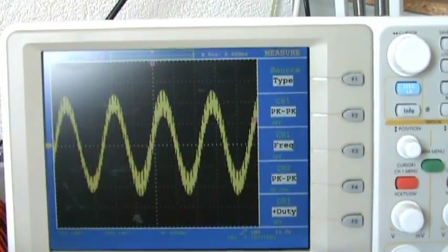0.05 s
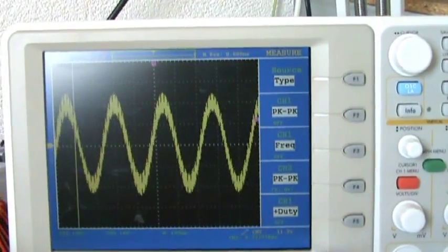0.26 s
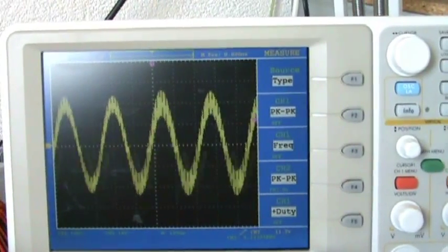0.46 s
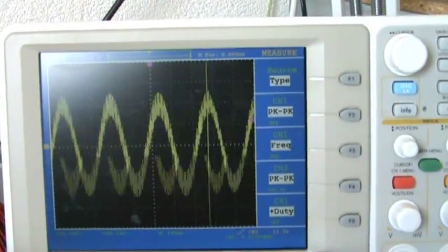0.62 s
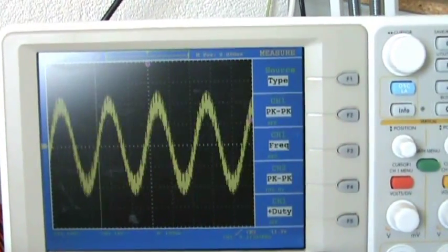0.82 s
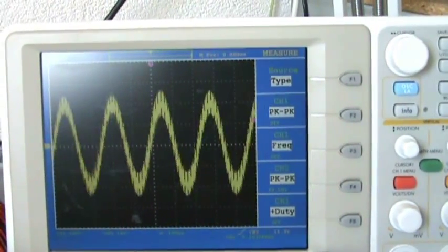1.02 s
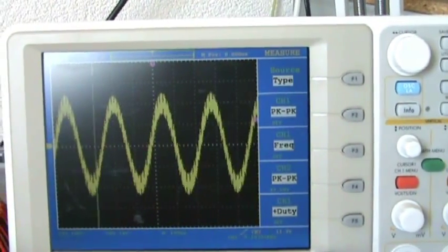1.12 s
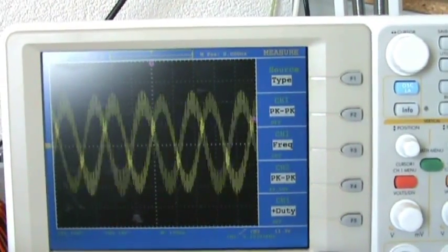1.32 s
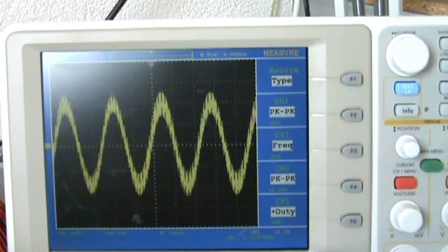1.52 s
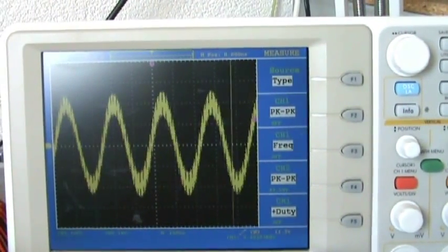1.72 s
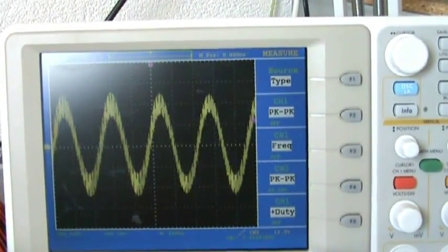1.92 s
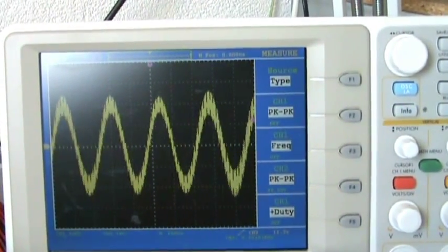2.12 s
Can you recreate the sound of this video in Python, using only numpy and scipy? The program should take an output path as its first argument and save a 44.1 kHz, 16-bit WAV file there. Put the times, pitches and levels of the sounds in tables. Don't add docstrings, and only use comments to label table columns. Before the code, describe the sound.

A running electrical circuit buzzes without pause from 0 to about 2.1 seconds: a thin, raspy mid-pitched buzz, a dominant piercing steady whine very high up, and bright hiss pulsing with the buzz. Low hum, fan drone and soft room air lie faintly beneath. Barely audible dull knocks fall around 0.6 and 0.9. At 1.64 a small dry plastic click rattles briefly, close by, slightly left.

```python
import sys
import numpy as np
from scipy import signal
from scipy.io import wavfile

SR = 44100
rng = np.random.default_rng(int(sys.argv[2]) if len(sys.argv) > 2 else 0)


def store_pcm(level_fs):
    pcm = np.round(np.clip(level_fs, -1, 1) * 32767).astype(np.int16)
    wavfile.write(sys.argv[1], SR, np.atleast_2d(pcm).T)


def voltage_ratio(decibels):
    exponent = np.asarray(decibels, float) / 20
    return 10 ** exponent


N = 95300

# t/s, f/Hz
SWITCHING_RATE = [(0, 352.8), (.2, 352.4), (.3, 351.5), (.37, 352.8), (.55, 352.1), (.9, 352.5),
                  (.97, 353.2), (1.15, 352.2), (1.25, 353.5), (1.55, 352.7), (1.75, 353.1), (1.9, 352.2),
                  (2.16, 353.0)]
WANDER_HZ, WANDER_PER_S = .36, 14
# t/s, level/dB
LOAD = [(0, -.2), (.47, -.3), (.7, .6), (1.0, .6), (1.3, -.2), (1.7, 0), (2.16, -.5)]
# multiple of the rate/1, level/dB rms, side under middle/dB, left over right/dB
BUZZ_OVERTONES = [(2, -63, -10, 2), (3, -61, -13, 3), (4, -66, -6, 7), (5, -57, -30, 0), (6, -54, -30, 0),
                  (7, -57, -27, 0), (8, -51, -30, 0), (9, -51, -30, 0), (10, -49, -23, 0), (11, -49, -10, 4),
                  (12, -45, -15, 1), (13, -53, -9, -1), (14, -45, -22, 0), (15, -50, -22, 0), (16, -56, -7, 3),
                  (17, -51, -30, 0), (18, -53, -27, 0), (19, -56, -30, 0), (20, -50, -9, -1),
                  (21, -47, -11, -3),
                  (22,-48,-10,3), (23,-44,-13,3), (24,-49,-5,0), (25,-44,-11,4), (26,-51,-4,4),
                  (27,-46,-6,5), (28,-51,-1,8), (29,-47,-6,-5), (30,-53,-5,2), (31,-48,-2,10), (32,-52,3,6),
                  (33,-43,-7,7), (34,-52,0,1), (35,-55,4,1), (36,-54,3,9), (37,-47,-10,-1), (38,-55,-3,6),
                  (39,-48,-13,2), (40,-51,-11,3), (41,-54,-10,4), (42,-65,-2,3)]
BUZZ_DB, FLUTTER_LOW_DB, FLUTTER_HIGH_DB, FLUTTER_PER_S = .6, .5, 1.5, 14
TIGHT_UP_TO = 12
# f/Hz, level/dB rms
ROUGH = [(4000, -57), (5500, -56), (6500, -57), (7500, -47.5), (9000, -45), (11000, -46), (13000, -51.5),
         (15000, -50)]
ROUGH_PER_S = 65
# f/Hz, level/dB rms, left over right/dB,
STEADY_TONES = [(8406.9, -29.7, 1, .01, .3), (4203.45, -52, 6, .3, 1), (70.05, -59.5, 0, .005, 1.2)]
# f/Hz, level/dB per Hz
CORONA = [(2500, -18), (3500, -15.5), (4800, 1.5), (6000, -10), (8000, 0), (11000, 0), (13500, 3),
          (15000, 0.5)]
CORONA_DB, CORONA_LEFT_DB, CORONA_PULSING = -34.5, 3, .5
# t/s, peak level/dB
SNAP_CONTACTS = [
    (1.6431, -18),
    (1.6454, -15.5),
    (1.6466, -22),
    (1.6558, -28),
    (1.6662, -33),
]
# f/Hz, level/dB, t60/s
SNAP_BODY = [(2300, -12, .012), (2700, -6, .012), (3080, 0, .022), (3330, -4, .014), (4000, -12, .006),
             (5700, -9, .003), (7500, -5, .005)]
SNAP_DB, SNAP_UNEVEN_DB, SNAP_LEFT_DB = 2, 1.5, 4
SNAP_ROOM_DB, SNAP_ROOM_T60_S, SNAP_ROOM_SPREAD = -39, .25, .5
# multiple of its turning rate/1, level/dB rms, left over right/dB
FAN_TONES = [(7, -71, 1), (8, -72, 2), (12, -66, 1), (14, -72, 3), (21, -71, 4), (28, -62, 2), (29, -71, 0),
             (32, -71, 2), (33, -67, 3), (34, -74, 7), (36, -71, 4), (38, -75, 8), (39, -69, 8),
             (40, -59, 6), (41, -74, 6), (43, -72, 2), (44, -72, 5), (52, -74, 5), (56, -67, 3),
             (57, -70, 8), (59, -68, 6), (60, -58, 5)]
FAN_TURNS_PER_S, FAN_DB = 24.713, 1
# f/Hz, level/dB per Hz
AIR = [(30, -14), (50, 5.5), (100, -12.5), (180, -6.5), (350, -10), (650, -12), (1200, -13.5),
       (1850, -17.5)]
AIR_DB, AIR_LEFT_DB = -52, 1
# f/Hz, likeness/0-1
LIKENESS = [(50, 0.96), (125, 1), (300, 0.54), (1200, 0), (2300, 0.87), (6500, 0.84), (7500, 0.86),
            (13000, 0.2)]
# t/s, level/dB, f/Hz
FAR_KNOCKS = [
    (.575, -52, 950),
    (.610, -53, 2100),
    (.89, -51, 2550),
    (1.658, -45, 1250),
]
FAR_RISE_S, FAR_T60_S, FAR_RING_S = .04, .12, .006


def buzz(turns):
    out, start = 0, 0
    for k, db, side_db, left_db in BUZZ_OVERTONES:
        scattered = k > TIGHT_UP_TO
        start += rng.normal() * (.1 if scattered else .07)
        side, tilt = voltage_ratio(side_db), np.tanh(left_db * np.log(10) / 20)
        angle = np.arccos(np.clip(tilt * (1 + side ** 2) / (2 * side), -1, 1))
        stereo = 1 + side * np.exp(1j * angle) * np.array([[1], [-1]])
        flutter_db = FLUTTER_LOW_DB + (FLUTTER_HIGH_DB - FLUTTER_LOW_DB) * (k / 42) ** 2
        steady = voltage_ratio(db + BUZZ_DB + flutter_db * drift(FLUTTER_PER_S)) * stereo
        rough = rough_skirt(k * SWITCHING_RATE[0][1]) if scattered else 0
        out = out + np.sqrt(2) * np.real((steady + rough) * np.exp(2j * np.pi * (k * turns + start)))
    return out


def rough_skirt(hz):
    both = drift(ROUGH_PER_S) + 1j * drift(ROUGH_PER_S)
    apart = drift(ROUGH_PER_S) + 1j * drift(ROUGH_PER_S)
    return voltage_ratio(at_hz(ROUGH, hz)) / 2 * part_alike(both, apart, hz) * sides(CORONA_LEFT_DB)


def whine_and_hum():
    t = np.arange(N) / SR
    return [tone(hz * t + rng.random(), db, left_db, lag, flutter_db, 6.3)
            for hz, db, left_db, lag, flutter_db in STEADY_TONES]


def corona(turns):
    pulsing = rms_one(np.exp(CORONA_PULSING * np.cos(2 * np.pi * turns)))
    return voltage_ratio(CORONA_DB) * sides(CORONA_LEFT_DB) * pulsing * noise(CORONA, patchy_db=.3)


def snap():
    s, db = np.transpose(SNAP_CONTACTS)
    out = np.zeros(N)
    for hz, level_db, t60 in SNAP_BODY:
        clicks = np.zeros(N)
        uneven_db = SNAP_UNEVEN_DB * rng.standard_normal(len(s))
        clicks[(s * SR).astype(int)] = voltage_ratio(db + level_db + SNAP_DB + uneven_db)
        out += ring(clicks, hz, t60)
    out = signal.sosfilt(signal.butter(3, 2000, "high", fs=SR, output="sos"), out)
    t = np.arange(SR // 2) / SR
    decay = voltage_ratio(SNAP_ROOM_DB - 60 * t / SNAP_ROOM_T60_S) * (t > .004)
    mid, side = rng.standard_normal((2, len(t))) * decay
    tail = mid + SNAP_ROOM_SPREAD * side * np.array([[1], [-1]])
    return out * sides(SNAP_LEFT_DB) + signal.fftconvolve(out[None], tail, axes=1)[:, :N]


def fan():
    turns = FAN_TURNS_PER_S * np.arange(N) / SR
    return sum(tone(k * turns + rng.random(), db + FAN_DB, left_db, .06, .8, 4)
               for k, db, left_db in FAN_TONES)


def room_air():
    return voltage_ratio(AIR_DB) * sides(AIR_LEFT_DB) * noise(AIR, patchy_db=.6)


def far_knocks():
    t, out = np.arange(N) / SR, 0
    for s, db, hz in FAR_KNOCKS:
        struck = ring(rng.standard_normal(N), hz, FAR_RING_S)
        puff = rms_one(ring(struck, hz, FAR_RING_S))
        fall_s = np.where(t < s, FAR_RISE_S, FAR_T60_S)
        out = out + puff * voltage_ratio(db - 60 * np.abs(t - s) / fall_s)
    return out


def tone(turns, db, left_db, lag, flutter_db, rate):
    level = np.sqrt(2) * voltage_ratio(db + flutter_db * drift(rate)) * sides(left_db)
    return level * np.cos(2 * np.pi * (turns - lag * np.array([[0], [1]])))


def noise(spectrum, patchy_db):
    out, white = 0, rng.standard_normal((2, 2, N))
    edges = 19.1 * 2 ** np.arange(0, 10, .5)
    for k, (low, high) in enumerate(zip(edges, np.append(edges[1:], 19000))):
        hz = np.sqrt(low * high)
        if spectrum[0][0] / 1.5 < hz < spectrum[-1][0] * 1.5:
            band = signal.butter(3, [low, high], "band", fs=SR, output="sos")
            mid, side = signal.sosfilt(band, white[k % 2])
            gain = voltage_ratio(at_hz(spectrum, hz) + patchy_db * drift(10))
            out = out + gain * part_alike(mid, side, hz)
    return rms_one(out)


def ring(clicks, hz, t60):
    r, w = voltage_ratio(-60 / (t60 * SR)), 2 * np.pi * hz / SR
    return signal.lfilter([0, np.sin(w)], [1, -2 * r * np.cos(w), r * r], clicks + 1e-18)


def part_alike(mid, side, hz):
    alike = np.clip(at_hz(LIKENESS, hz), 0, 1)
    return np.sqrt(1 + alike) * mid + np.sqrt(1 - alike) * side * np.array([[1], [-1]])


def sides(left_db):
    return voltage_ratio([[left_db / 2], [-left_db / 2]])


def drift(rate):
    r = np.exp(-80 * np.pi * rate / SR)
    slow = signal.lfilter([1], [1, -2 * r, r * r], rng.standard_normal(N // 40 + 2002))[2000:]
    return np.interp(np.arange(N) / 40, np.arange(len(slow)), rms_one(slow - slow.mean()))


def rms_one(x):
    return x / np.sqrt(np.mean(x ** 2) + 1e-20)


def in_time(rows):
    return np.interp(np.arange(N) / SR, *np.transpose(rows))


def at_hz(points, hz):
    f, db = np.transpose(points)
    return np.interp(np.log(hz), np.log(f), db)


def scene():
    turns = np.cumsum(in_time(SWITCHING_RATE) + WANDER_HZ * drift(WANDER_PER_S)) / SR
    core, half, hum = whine_and_hum()
    loaded = voltage_ratio(in_time(LOAD)) * (core + half + corona(turns))
    return buzz(turns) + loaded + hum + snap() + fan() + room_air() + far_knocks()


def band_limit(x):
    return signal.sosfilt(signal.butter(12, 15240, fs=SR, output="sos"), x)


def record(dry):
    cut = signal.sosfilt(signal.ellip(12, .5, 70, 15130, fs=SR, output="sos"), dry)
    return band_limit(cut)


dry = scene()
out = record(dry)
store_pcm(out)
```